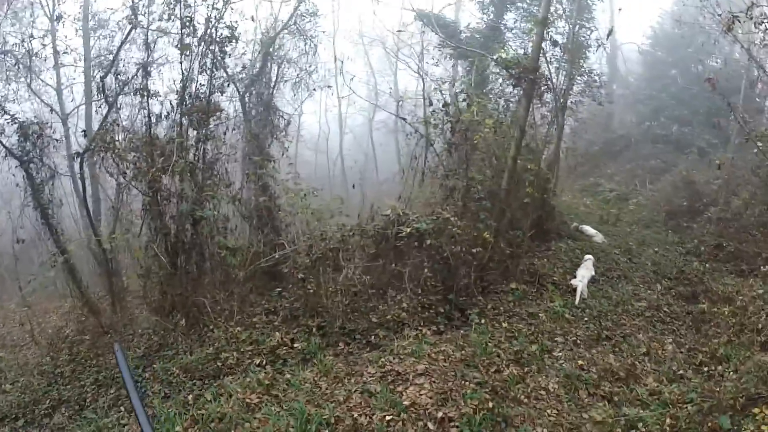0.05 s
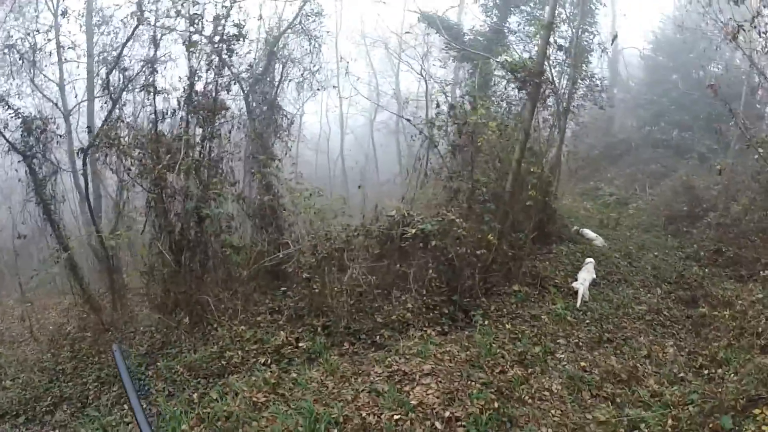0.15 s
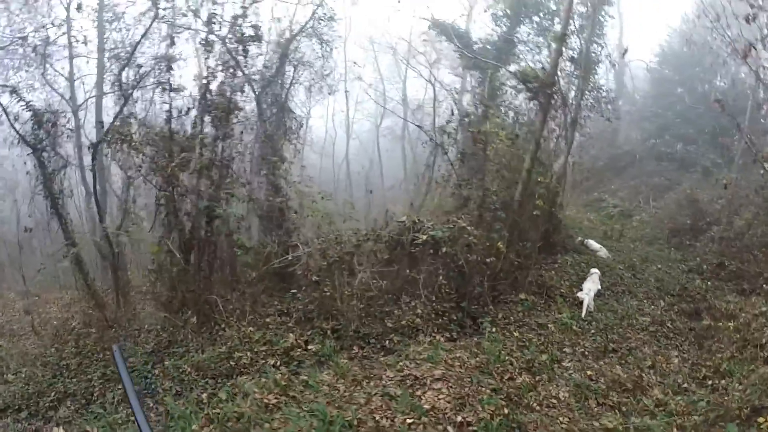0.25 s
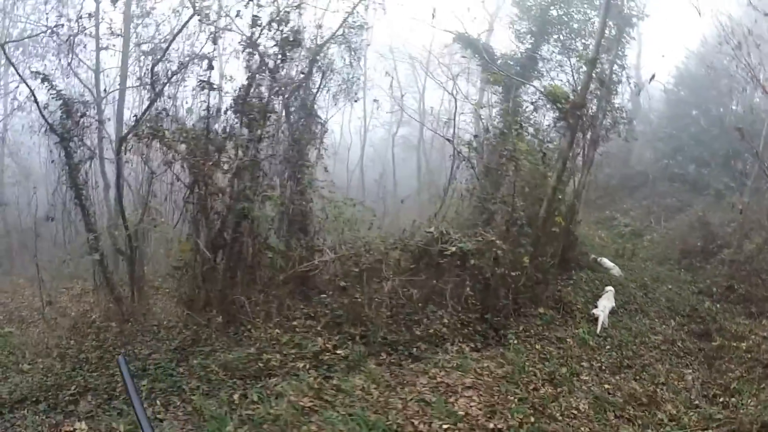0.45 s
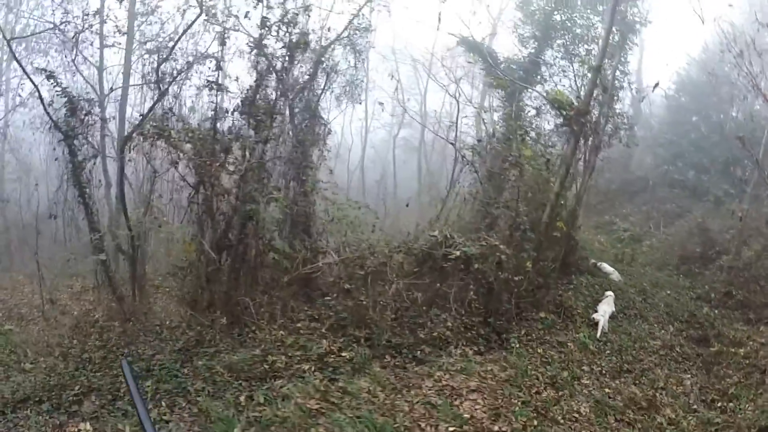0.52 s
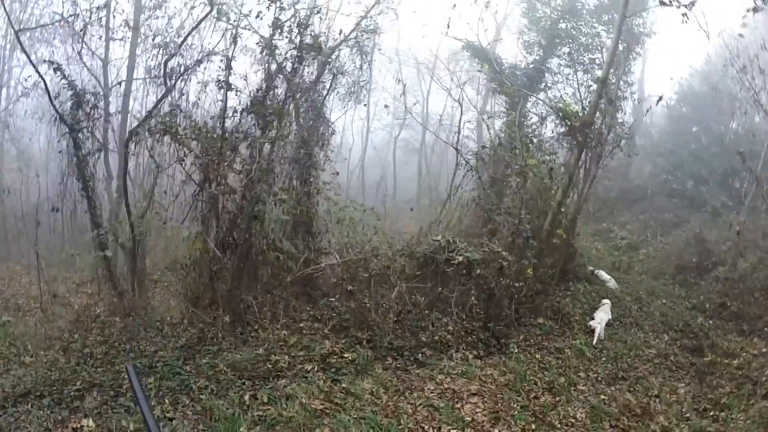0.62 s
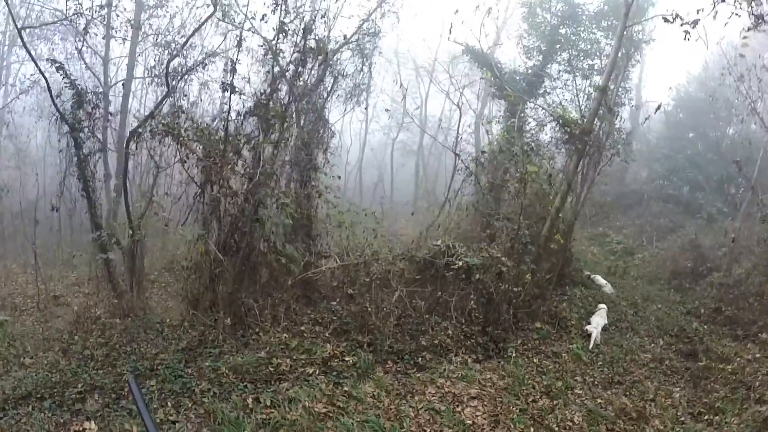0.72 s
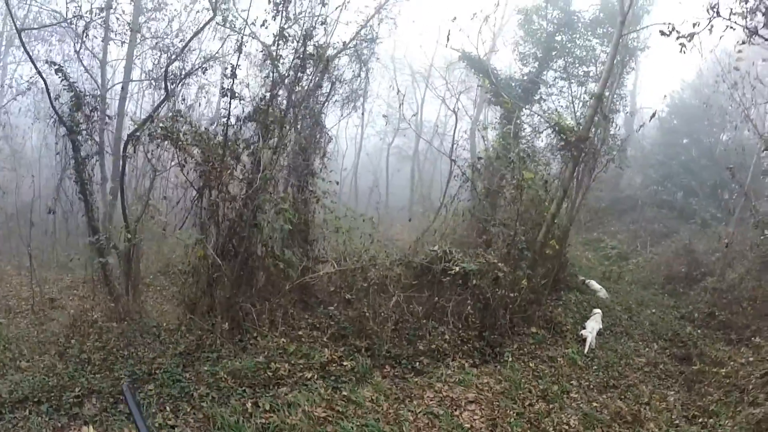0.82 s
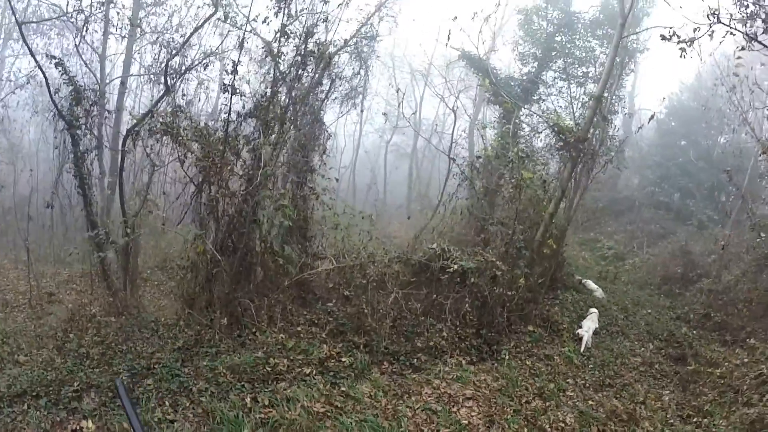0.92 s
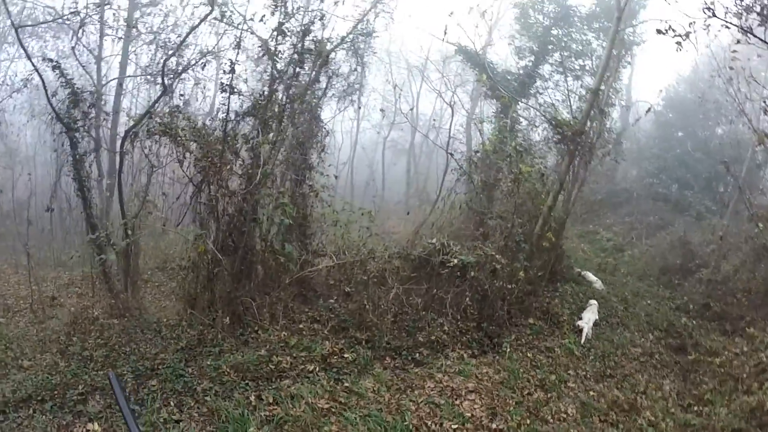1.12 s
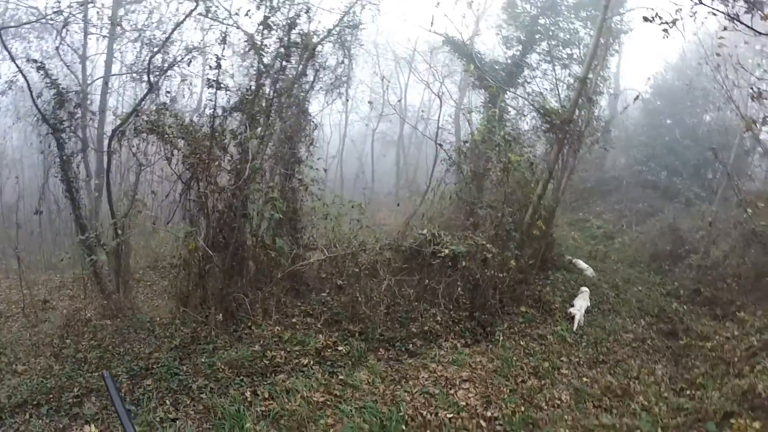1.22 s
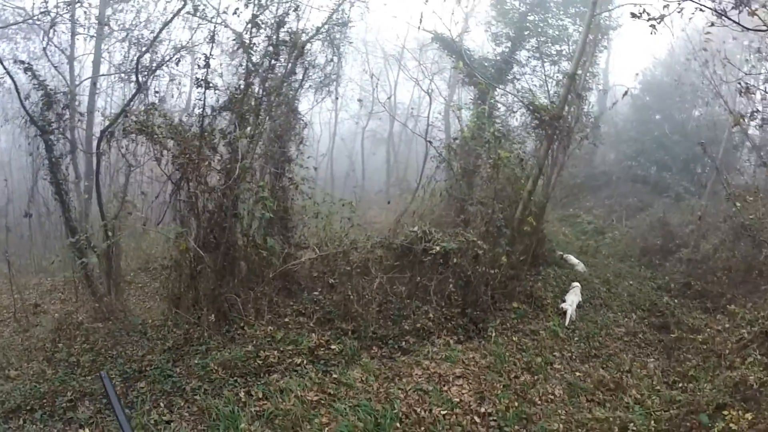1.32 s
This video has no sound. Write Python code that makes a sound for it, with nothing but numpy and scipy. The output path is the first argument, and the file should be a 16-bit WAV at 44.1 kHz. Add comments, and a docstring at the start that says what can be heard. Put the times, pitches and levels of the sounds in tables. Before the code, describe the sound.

Wind buffets the microphone from about 0.2 to 0.7 seconds, a low fluttering rumble with four soft thumps. As it dies, a jacket sleeve close by makes a bright swish around 0.6 seconds, then a softer, duller one that fades by 1.1 seconds. Creases tick lightly near 0.5, 0.6 and 1.1 seconds. The faint, dull hush of a still wood lies underneath throughout.

```python
"""A low flutter comes first: the eddies of a short gust buffet the microphone in a still, foggy wood.
As it dies, something close by, probably a jacket sleeve, rubs in one bright swish and a softer,
duller one. Thousands of tiny slips of the weave make the hiss, and flipping creases add soft ticks.
Under both lies the faint, dull wash of the far surroundings."""
import sys
import numpy as np
from scipy import signal
from scipy.fft import rfft, irfft
from scipy.io import wavfile

SR = 44100
rng = np.random.default_rng(int(sys.argv[2]) if len(sys.argv) > 2 else 0)


def store_wav(level_fs):
    """Save 16-bit WAV to argv[1]."""
    pcm = np.round(np.clip(np.atleast_2d(level_fs), -1, 1) * 32767)
    wavfile.write(sys.argv[1], SR, pcm.T.astype(np.int16))


N = 59535

# swell of the wind rumble on the microphone: t/s, level/dB
GUST_LEVEL = [(.17, -79), (.22, -55), (.27, -41), (.315, -47.5), (.39, -43), (.46, -37), (.5, -38.5),
              (.57, -36.5), (.63, -40), (.67, -44.5), (.72, -66), (.77, -84)]
# top edge of the rumble, higher for smaller eddies: t/s, f/Hz
GUST_CUTOFF = [(.26, 80.6), (.38, 98), (.52, 127.4), (.58, 104), (.68, 78)]
# single strong thumps of air: t/s, peak level/dB, centre-to-peak time/s
BUFFET_HITS = [(.287, -34, 0.0034), (0.342, -28, 0.0031), (0.46, -33, 0.009), (0.599, -37, 0.0029)]
# the sleeve's strokes, loudness and brightness: t/s, level/dB, tilt/(dB per octave)
RUB_STROKES = [(0, -62.5, -0.6), (.235, -62.5, -.6), (.26, -59, 1.1), (.35, -56, -0.3), (.39, -57.5, -0.5),
               (.495, -59.5, 0.5), (.565, -54, 0.1), (.605, -47, 0.2), (.652, -46, 1.14),
               (.725, -48.5, 0.77), (.785, -51.5, 0.05), (.85, -50.5, 0.3), (.92, -52, -0.1),
               (.97, -56, -0.8), (1.055, -57, -1.7), (1.08, -66, 1.7), (1.14, -67.5, 0),
               (1.35, -62.5, -4.8)]
# broad tone of the cloth's hiss: f/Hz, level/dB
CLOTH_EQ = [(100, -15.5), (300, -3), (550, 1), (760, -0.5), (1030, 1.75), (1900, -3.5), (3000, -6),
            (4500, -8.5), (8000, -13), (12500, -15.5), (15000, -18.5)]
# hollow resonances that colour the cloth: f/Hz, width/Hz, gain/dB
CLOTH_RESONANCES = [(590, 190, 2.5), (898, 69, 3.5), (1050, 160, -0.5), (1240, 140, 1), (1640, 200, 2),
                    (2050, 110, 3), (2780, 280, 1.5), (3270, 250, 2)]
# creases that snap: t/s, peak level/dB
CREASE_HITS = [(0.51, -44), (.604, -38), (0.615, -53), (1.055, -50)]
# dark tone of the far surroundings: f/Hz, level/dB
WASH_EQ = [(20, 1), (45, 2.5), (130, 0.5), (200, -0.5), (300, 0), (400, -7.5), (580, -3), (800, -13.5),
           (1500, -13), (3000, -19), (6000, -24), (10000, -31.5), (15000, -43)]
# fader ride of the far wash: t/s, level/dB
WASH_LEVEL = [(0, -59), (.12, -59), (.18, -55), (.3, -57), (1.05, -57.5), (1.12, -58), (1.28, -59),
              (1.31, -57.5), (1.35, -56.5)]


def gust(low_cut_hz=30, rolloff_order=4.01, steadiness=0.23):
    """Eddies flutter on the microphone port; they get smaller at the height of the gust."""
    def rumble_band(hz, s):
        port = hz ** 2 / (hz ** 2 + low_cut_hz ** 2)
        return port / np.sqrt(1 + (hz / follow(GUST_CUTOFF, s)) ** (2 * rolloff_order))

    eddies = sweep(rng.standard_normal(N), rumble_band, size=2048)
    power = signal.fftconvolve(eddies ** 2, np.hanning(SR // 20), "same")
    compressed = eddies / (abs(power) + 1e-9) ** (steadiness / 2)
    return unit_rms(compressed) * amp(follow(GUST_LEVEL, np.arange(N) / SR))


def buffets():
    """Each large eddy thumps as it passes: a push, then a pull."""
    t, thumps = np.arange(N) / SR, np.zeros(N)
    for centre_s, db, to_peak_s in BUFFET_HITS:
        passage = (t - centre_s) / to_peak_s
        thumps -= amp(db) * passage * np.exp((1 - passage ** 2) / 2)
    return thumps


def sleeve(slips_per_s=7500, spread_db=3.0, smooth_share=0.56, flicker_db=0.05):
    """Thousands of tiny slips of the weave merge with smooth hiss into a swish."""
    signs = rng.choice([-1., 1.], N)
    strengths = amp(spread_db * np.minimum(rng.exponential(1, N), 4))
    slips = signs * strengths * (rng.random(N) < slips_per_s / SR)
    grain = np.sqrt(1 - smooth_share) * unit_rms(slips)
    hiss = np.sqrt(smooth_share) * rng.standard_normal(N)
    swish = unit_rms(sweep(grain + hiss, rub_tone))
    return swish * amp(follow(RUB_STROKES, np.arange(N) / SR) + flicker_db * wander(rate_hz=132))


def rub_tone(hz, s, pivot_hz=2000, rasp_at_s=0.621, rasp_hz=3100, rasp_db=5):
    """The cloth rasps as it breaks loose, and its tone brightens and dulls with the strokes."""
    time_offset = (s - rasp_at_s) / 0.025  # half-width, s
    pitch_offset = np.log2((hz + 1) / rasp_hz) / 0.47  # half-width, octaves
    boost_db = rasp_db * np.exp(-time_offset ** 2 - pitch_offset ** 2)
    tilt_db = follow(RUB_STROKES, s, axis=2) * np.log2((hz + 100) / pivot_hz)
    return cloth_tone(hz) * amp(boost_db + tilt_db)


def cloth_tone(hz):
    """The cloth's broad colour with its hollow resonances."""
    hollow_db = sum(db / (1 + (2 * (hz - f) / width) ** 2) for f, width, db in CLOTH_RESONANCES)
    return amp(eq_db(CLOTH_EQ, hz) + hollow_db)


def creases(decay_s=0.002):
    """Folds of the cloth flip over with soft ticks."""
    t, ticks = np.arange(N) / SR, np.zeros(N)
    for start_s, db in CREASE_HITS:
        burst = rng.standard_normal(N) * (t >= start_s) * np.exp(-abs(t - start_s) / decay_s)
        tick = colour(burst, cloth_tone)
        ticks += amp(db) * tick / abs(tick).max()
    return ticks


def far_wash(waver_db=0.8, waver_hz=25):
    """The distant wood lays down a dull, gently wavering bed."""
    bed = unit_rms(colour(rng.standard_normal(N), lambda hz: amp(eq_db(WASH_EQ, hz))))
    return bed * amp(follow(WASH_LEVEL, np.arange(N) / SR) + waver_db * wander(waver_hz))


def amp(db):
    """Decibels to gain."""
    return 10 ** (np.asarray(db) / 20)


def unit_rms(x):
    """Scales to rms 1."""
    return x / np.sqrt(np.mean(x ** 2) + 1e-20)


def eq_db(curve, hz):
    """Reads an EQ curve on a log-frequency axis."""
    f, db = np.transpose(curve)
    return np.interp(np.log(hz + 1), np.log(f + 1), db)


def follow(table, t, axis=1):
    """One column of an automation curve at times t."""
    rows = np.array(table)
    return np.interp(t, rows[:, 0], rows[:, axis])


def colour(x, gain):
    """A static EQ; gain is a function of frequency."""
    return irfft(rfft(x) * gain(np.fft.rfftfreq(N, 1 / SR)), N)


def wander(rate_hz):
    """Random modulation of rms 1, mostly below rate_hz."""
    return unit_rms(colour(rng.standard_normal(N), lambda hz: 1 / (1 + (hz / rate_hz) ** 4)))


def sweep(x, gain, size=512):
    """A moving filter of constant power; gain is a function of frequency and time."""
    hz, t, frames = signal.stft(x, SR, nperseg=size, noverlap=size * 3 // 4)
    gains = gain(hz[:, None], t)
    gains = gains / np.sqrt(np.mean(gains ** 2, axis=0))
    return signal.istft(frames * gains, SR, nperseg=size, noverlap=size * 3 // 4)[1][:N]


def scene():
    """Wind and cloth over the far wash, all panned centre."""
    mono = far_wash() + gust() + buffets() + sleeve() + creases()
    return np.array([mono, mono])


def record(dry, high_cut_hz=15300):
    """A steep high cut takes off the top air."""
    lowpass = signal.firwin(511, high_cut_hz, window=("kaiser", 9), fs=SR)
    return signal.oaconvolve(dry, lowpass[None], "same")


dry = scene()
out = record(dry)
store_wav(out)
```